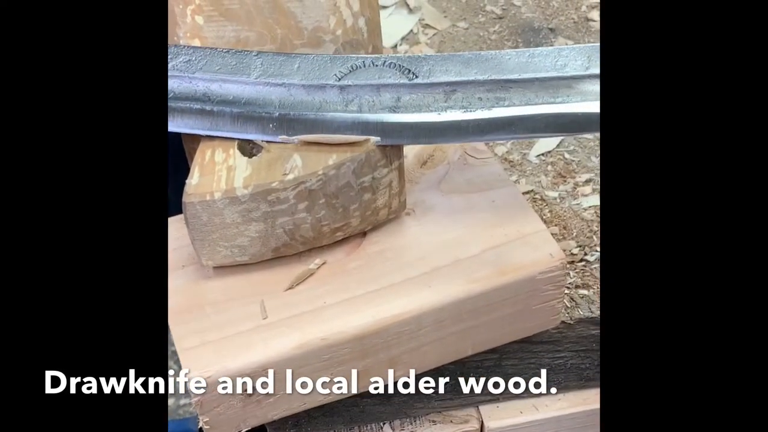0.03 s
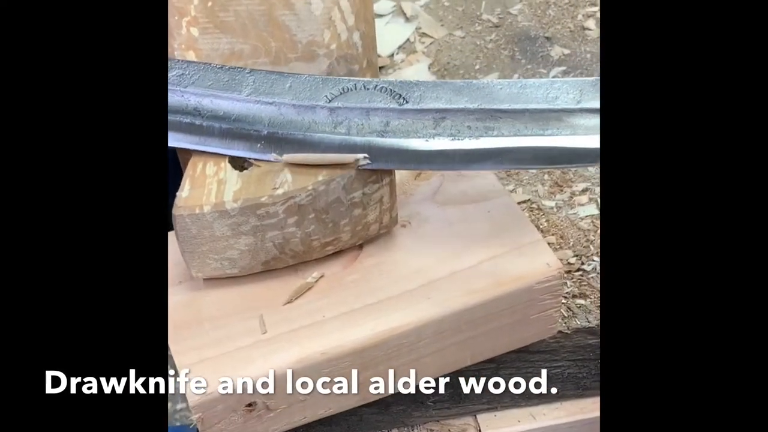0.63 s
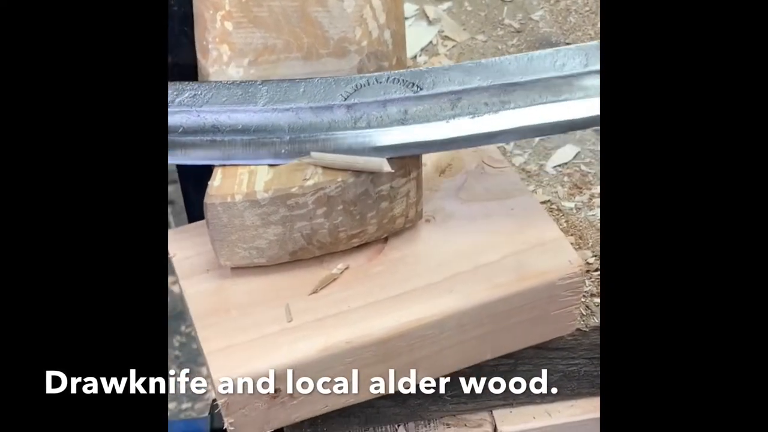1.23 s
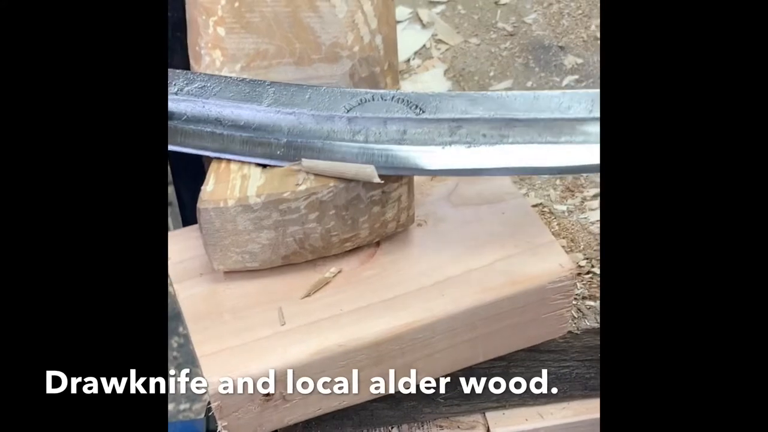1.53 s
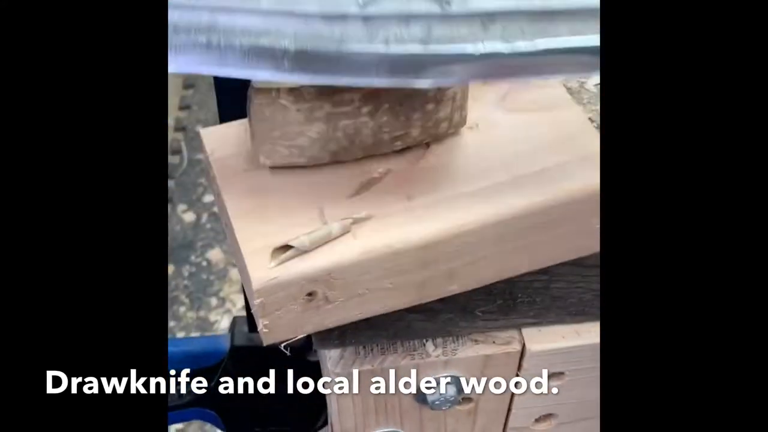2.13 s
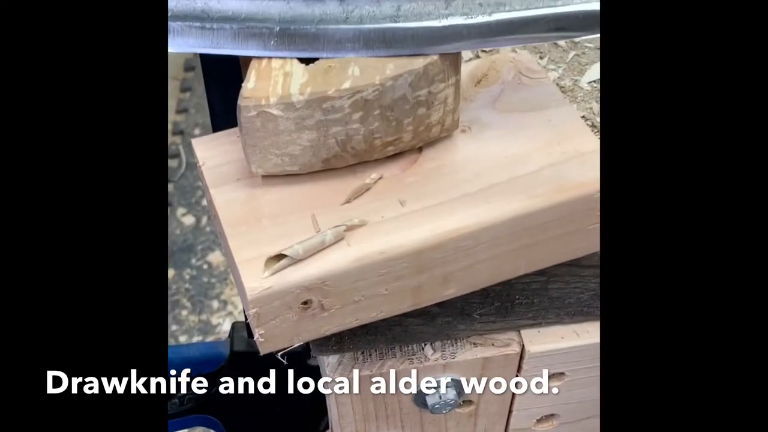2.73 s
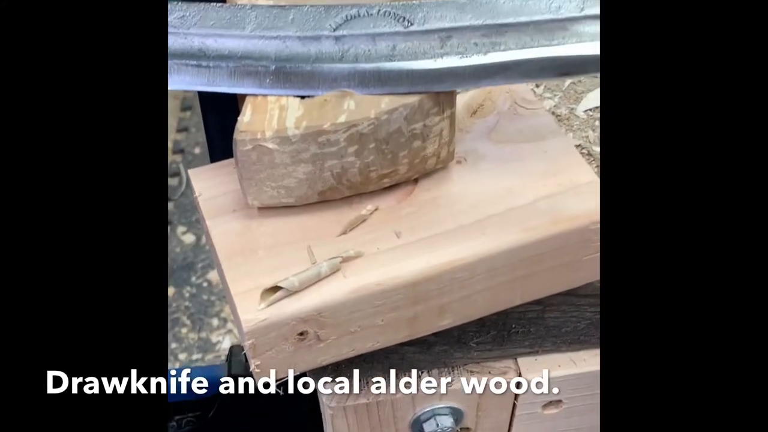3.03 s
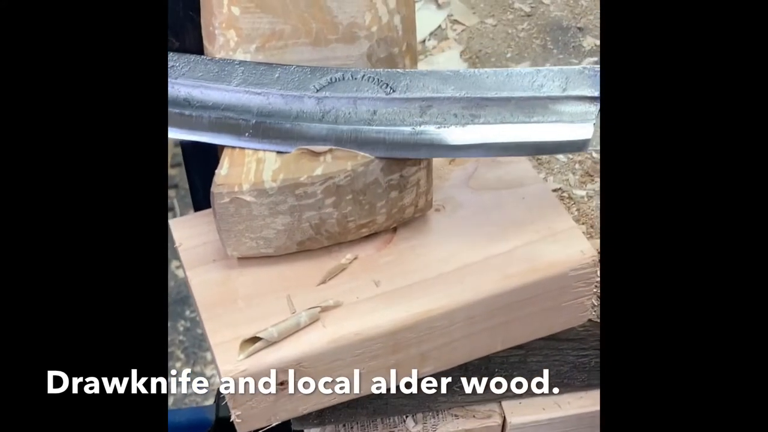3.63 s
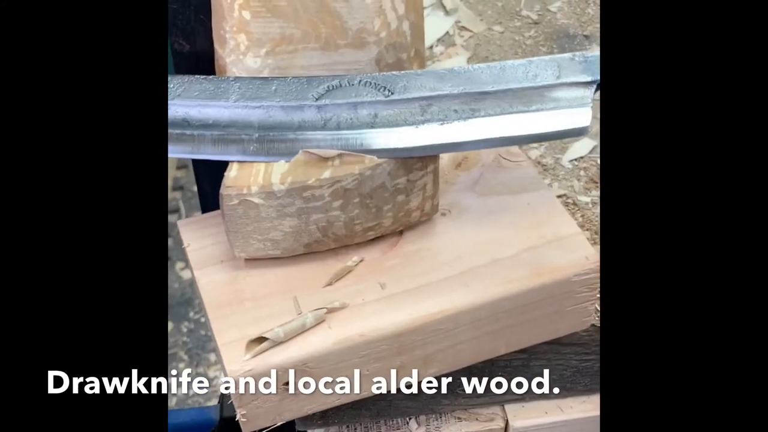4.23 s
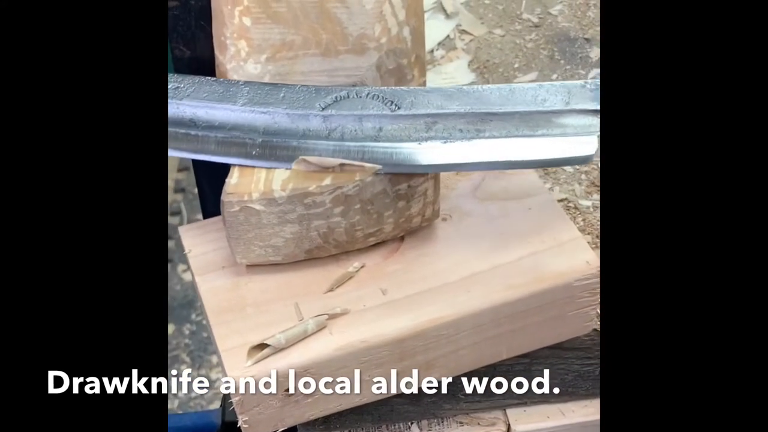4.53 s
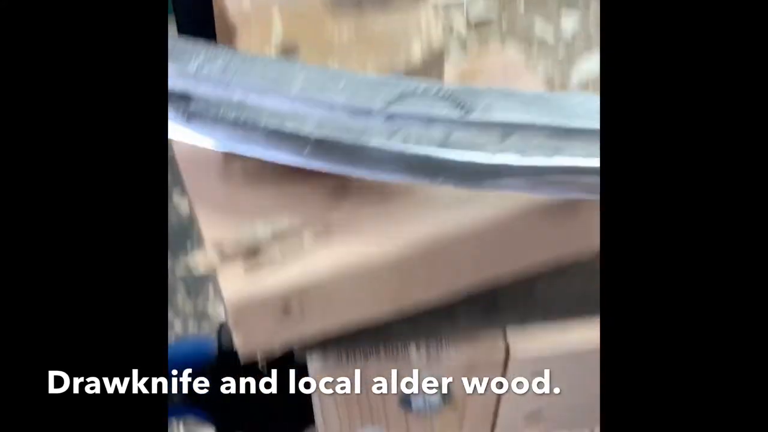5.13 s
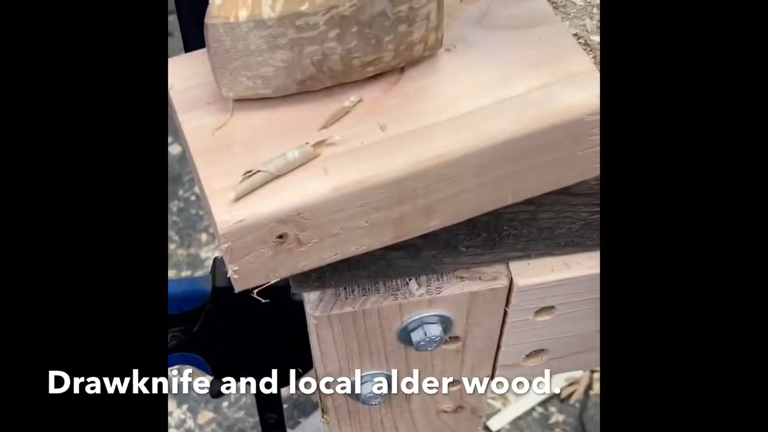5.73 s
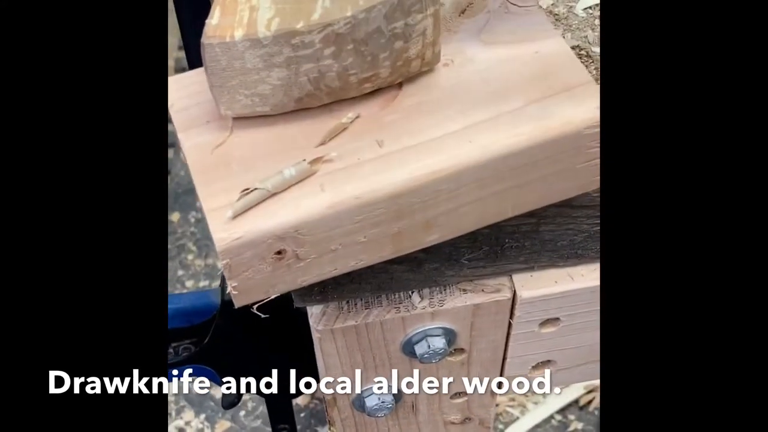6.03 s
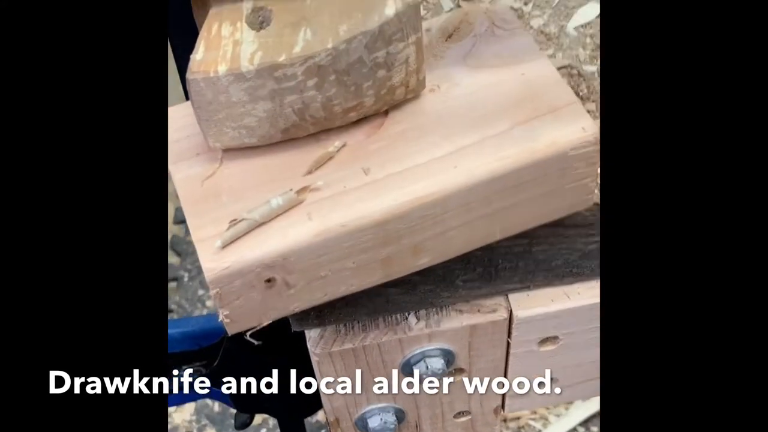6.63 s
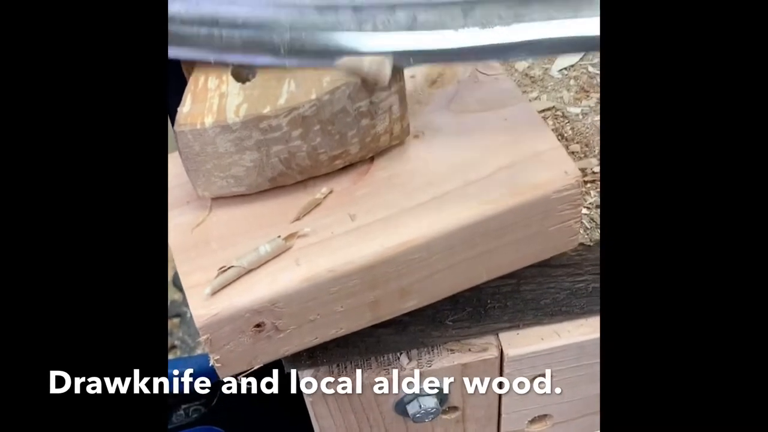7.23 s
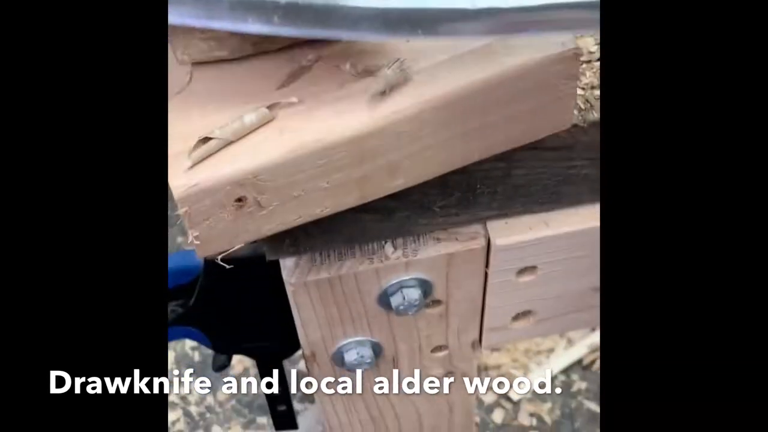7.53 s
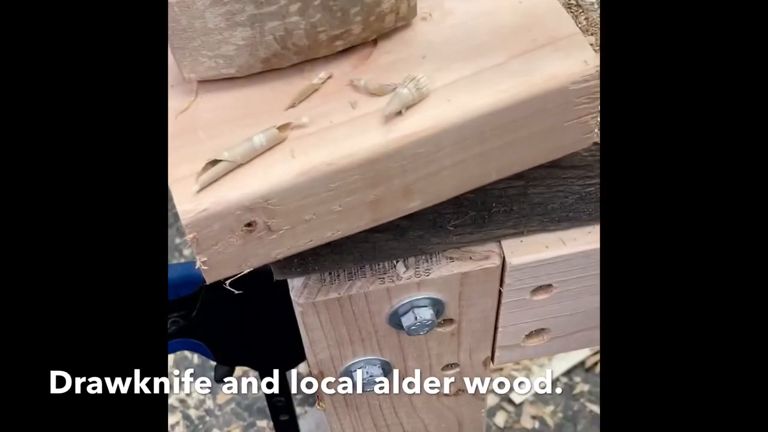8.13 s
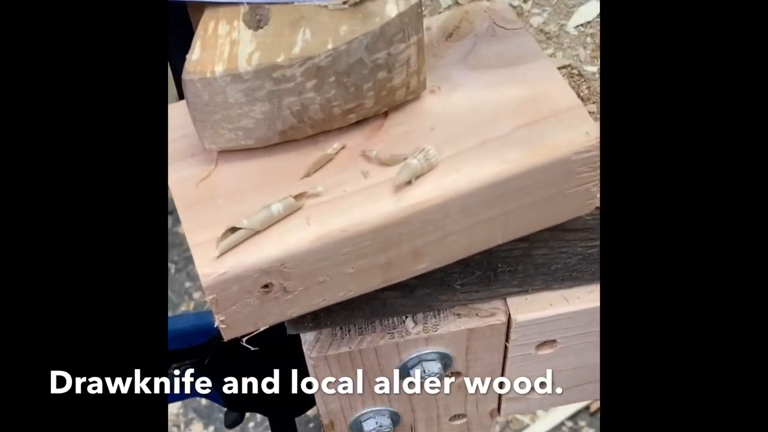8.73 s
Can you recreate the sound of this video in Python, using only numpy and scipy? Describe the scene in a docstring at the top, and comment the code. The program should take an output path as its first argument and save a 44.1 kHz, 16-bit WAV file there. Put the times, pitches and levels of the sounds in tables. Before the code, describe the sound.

Close, uneven strokes of a steel blade shaving wood, light scrapes alternating with crackling tears and a few wooden knocks.

```python
"""Drawknife on alder

A drawknife shaves a billet on a workshop bench, close to a phone with two microphone ports.
The edge glides over the grain, bites and rips off shavings: fibres snap and ring the blade,
slips shake the billet, the sticking edge creaks. The tool knocks on the wood and the bench bumps.
The small room answers over a low rumble, a faint hum and a distant rush."""
import sys
import numpy as np
from scipy import signal
from scipy.fft import rfft, irfft
from scipy.io import wavfile
from scipy.ndimage import uniform_filter1d

SR = 44100
rng = np.random.default_rng(int(sys.argv[2]) if len(sys.argv) > 2 else 0)


def unload_wav(signal):
    """Save mono or channel-first audio to the path in sys.argv[1] as 16-bit WAV at rate SR, clipped to [-1, 1]."""
    wavfile.write(
        sys.argv[1],
        SR,
        np.round(np.clip(np.atleast_2d(signal).T, -1, 1) * 32767).astype(np.int16),
    )


N = 396459
T = np.arange(N) / SR

# Room rumble spectrum (frequency [Hz], level [dB])
RUMBLE_COLOUR = [(20, -24), (40, -5), (70, 0), (110, -4), (160, -7), (230, -20), (400, -31), (800, -39),
                 (1500, -44), (4000, -44), (8000, -41), (15000, -43)]
# Distant rush envelope (time [s], level [dB])
RUSH_LEVEL = [(0, -72), (1.9, -89.5), (5.3, -69.5), (6.2, -67), (9, -68)]
# Side signal of the wood's low tones (time [s], gain [dB])
SIDE_GAIN = [(0, 2), (1.6, -5), (2.8, 7), (5, -13), (6.8, -36.5), (9, -30)]
# Lead of the left port (frequency [Hz], phase [rad])
PORT_PHASE = [(0, 0), (700, 0), (1150, 1.2), (1550, 1.6), (2200, .8), (2700, 1.), (4300, 1.2), (5500, 3.1),
              (6300, 3.2), (7900, 6.), (9000, 6.6), (10500, 9.2), (11600, 9.4), (13200, 12.4),
              (14300, 12.8), (15700, 15.5)]
# Clamped billet modes (frequency [Hz], level [dB], ring time [ratio])
BILLET_MODES = [(164, -16, 2.5), (207.2, -1, 1.2), (231.3, -7.5, .7), (284, -8, 0.63), (310, -4.5, 1.7),
                (381.9, -2, 1.1), (417.5, -3.5, 1.3), (477, -7, 1.4), (520.2, -5, 0.72),
                (575.6, -5.5, 0.97), (624, -4, 1.2), (679, -10, 0.75), (1064, -12.5, 1.3), (1144, -2, 0.86),
                (1147, -8, 1.0), (1300, -15, 0.35), (1510, -9.5, 0.9), (1640, -13, 1.5),
                (1710, -12.5, 0.47), (2200, -14.5, .54)]
# Blade-on-wood resonances (frequency [Hz], width [Hz], lift [dB])
CONTACT_MODES = [(1180, 150, 4), (1520, 170, 4), (2160, 40, 3), (2450, 150, 2), (3000, 200, 2),
                 (3300, 150, 3), (4590, 120, 3), (4950, 138, 4), (5210, 117, 6), (5740, 220, 7),
                 (5950, 200, 5), (6710, 299, 6), (6950, 277, 5), (7450, 94, 4), (7790, 340, 5),
                 (8550, 157, 8), (10060, 450, 6), (15400, 686, 6)]
# Narrow steel modes (frequency [Hz], width [Hz], lift [dB])
STEEL_MODES = [(1132, 45, 5), (2993, 60, 4), (3261, 25, 6), (3354, 25, 7), (4284, 18, 6), (4578, 20, 6),
               (7737, 27, 6), (7913, 27, 6)]
# Knock crack spectrum (frequency [Hz], level [dB])
KNOCK_COLOUR = [(500, -25.5), (1500, -0.5), (2700, -1.5), (4500, -5), (7000, -5.5), (10000, -13),
                (15500, -14)]
# Gliding edge spectrum (frequency [Hz], level [dB])
GLIDE_EDGE_COLOUR = [(200, -22), (500, -4), (900, -6.5), (1900, -9), (2700, 1.5), (4000, -0.5), (6000, 2),
                     (9000, -11), (12500, -13.5), (15500, -18.5)]
# Grazed billet spectrum (frequency [Hz], level [dB])
GLIDE_BILLET_COLOUR = [(60, -13.5), (140, -12.5), (210, 0), (400, 3.5), (600, -2.5), (800, -8.5),
                       (1100, -13.5), (1500, -12), (2100, -23), (4000, -41)]
# Cutting edge spectrum (frequency [Hz], level [dB])
CUT_EDGE_COLOUR = [(200, -30.5), (500, -1), (900, -5.5), (1900, -5.5), (2700, -16), (4000, 3), (6000, 3.5),
                   (9000, -5), (12500, -8.5), (15500, -11.5)]
# Jerked billet spectrum (frequency [Hz], level [dB])
CUT_BILLET_COLOUR = [(60, -15.5), (140, -26.5), (210, -3), (400, 2.5), (600, -2), (900, -15.5),
                     (1500, -18.5), (4000, -51)]
# Soft bench bumps (time [s], peak [dB], pitch [Hz], T60 [s])
BENCH_BUMPS = [(0.466, -49, 89, 0.58), (2.644, -30.5, 107, 0.069), (7.463, -25.5, 75, 0.1),
               (7.506, -23, 84.3, 0.055)]
# Blows on the billet, relative levels (time [s], thud [dB], billet [dB], ring [dB], crack [dB],
# T60 [s], billet pitch [Hz], ring pitch [Hz], crack top [Hz])
BLOWS = [(0.3007, -38, -30.5, -33, -22.5, 0.22, 557, 1560, 15900),
         (.467, -33, -22, -35, -32, 0.15, 445, 1300, 14000),
         (.492, -28, -30, -47.5, -54, 0.15, 350, 1500, 6100),
         (1.635, -39, -25, -43, -41, 0.17, 212, 960, 8840),
         (1.755, -44.5, -30, -35.5, -45, 0.16, 429, 1202, 3970),
         (1.769, -53, -28.5, -40.5, -45, 0.073, 384, 1620, 4140),
         (2.489, -50, -35.5, -55, -61, 0.17, 370, 1300, 3000),
         (2.5, -42, -51, -66, -53.5, 0.14, 405, 1420, 7100),
         (2.644, -30.5, -40.5, -41, -62, 0.059, 379, 770, 4000),
         (4.481, -73.5, -48.5, -45.5, -44, 0.13, 530, 1970, 5200),
         (4.547, -74, -60.5, -54, -65, 0.1, 495, 1770, 5100),
         (5.106, -55, -35, -40, -49.5, 0.12, 624, 1190, 6000),
         (7.212, -32, -21.5, -26.5, -30, 0.21, 337, 1430, 5910),
         (7.362, -45, -42, -41.5, -57.5, .12, 420.5, 1617, 2930),
         (7.668, -65.5, -55.5, -66.5, -83.5, 0.067, 446, 1194, 4040),
         (8.005, -39.5, -17, -22, -37.5, 0.25, 463, 1100, 4420)]
# Creaks of the sticking edge (start [s], length [s], first pitch [Hz], last pitch [Hz], level [dB])
EDGE_CREAKS = [(.312, 0.042, 1570, 1770, -45), (0.428, 0.015, 1350, 1300, -49.5),
               (0.481, 0.043, 1430, 1515, -43.5), (1.535, 0.088, 3320, 3230, -44),
               (1.568, .12, 1550, 1420, -46), (1.658, 0.057, 3100, 2740, -42),
               (2.71, 0.039, 2930, 2730, -57), (2.964, .06, 2850, 2924, -55),
               (4.728, 0.074, 1570, 1500, -54.5), (4.859, 0.2, 1566, 1420, -48.5),
               (4.897, 0.09, 2420, 2460, -45), (4.994, 0.044, 2120, 1970, -40.5),
               (4.999, 0.027, 3040, 2860, -35), (6.332, 0.076, 2704, 2770, -48.5),
               (7.179, .035, 3275, 2920, -27), (7.22, 0.059, 4620, 4560, -39.5)]
# Splinter snaps, relative levels (time [s], treble [dB], middle [dB])
SPLINTERS = [(.249, -46, -41.5), (0.611, -41, -40), (1.087, -42, -62), (1.372, -44, -41.5),
             (1.401, -42, -69.5), (1.518, -55, -35), (1.531, -30, -64), (1.544, -50, -33.5),
             (1.612, -28, -34), (1.637, -21.5, -28.5), (1.679, -32, -37.5), (1.707, -35, -48.5),
             (1.728, -33, -38), (1.731, -34, -43.5), (4.174, -63, -44), (4.205, -44.5, -52.5),
             (4.872, -65, -40.5), (4.903, -40, -41), (4.975, -30, -33.5), (5.061, -39, -43),
             (5.074, -41, -41), (5.187, -59, -57), (5.774, -52, -47.5), (5.976, -57.5, -58.5),
             (6.623, -65, -39.5), (6.839, -53, -39), (7.089, -43, -38), (7.14, -27, -22.5),
             (7.313, -50, -66), (8.247, -36, -48), (8.258, -48, -43), (8.27, -31.5, -38), (8.399, -42, -43),
             (8.442, -42, -27), (8.449, -32.5, -25), (8.555, -40, -56), (8.573, -48, -29.5),
             (8.702, -42, -43), (8.709, -34, -40.5), (8.764, -41, -43), (8.867, -43, -38),
             (8.876, -46, -52), (8.883, -42, -31.5), (8.947, -48, -49), (8.961, -30, -25.5)]
# Light passes, relative levels (start [s], rise [s], fall [s], edge [dB], billet [dB],
# rasp [Hz], squeak [Hz], top lift [dB])
GLIDE_STROKES = [(0, 0.0017, 0.043, -51, -54.5, 2680, 4210, -8),
                 (.072, 0.029, 0.052, -43.5, -50.5, 2840, 4500, 4.5),
                 (.15, 0.1, 0.19, -48.5, -57, 2910, 4400, 1.5),
                 (.385, 0.088, 0.061, -50, -45, 2500, 4500, -10),
                 (.585, 0.048, 0.18, -47.5, -47.5, 2760, 4270, 6.5),
                 (.865, 0.056, 0.14, -50.5, -59.5, 3300, 4150, 0.5),
                 (.925, 0.05, 0.091, -46, -52.5, 3010, 4170, 7),
                 (1.19, 0.21, 0.19, -52, -68, 2950, 5000, 3.5),
                 (1.435, 0.043, .029, -48, -56, 3170, 4900, 3),
                 (2.58, 0.034, 0.079, -61, -54.5, 2750, 4680, -12),
                 (2.58, 0.29, 0.4, -62, -58.5, 2850, 4700, 10),
                 (2.62, 0.049, 0.2, -52.5, -55.5, 2630, 4740, -5),
                 (2.71, 0.021, 0.028, -53.5, -54, 2860, 4770, -2),
                 (2.76, 0.037, 0.063, -55, -57.5, 2950, 4800, -3),
                 (2.81, 0.032, 0.023, -57, -60, 3000, 4700, -9),
                 (2.872, 0.024, 0.14, -52, -55, 2800, 4750, -7),
                 (2.955, 0.015, 0.043, -49, -59, 2760, 4920, -6),
                 (2.97, 0.03, 0.07, -49, -50, 2840, 4900, -7),
                 (3.075, 0.037, 0.067, -49, -53.5, 3020, 5200, -3),
                 (3.14, 0.018, 0.14, -57.5, -60, 2750, 4900, 3),
                 (3.205, 0.028, 0.2, -59.5, -83, 2880, 5030, 6),
                 (3.33, 0.036, 0.13, -53, -64.5, 3180, 5100, -1),
                 (3.415, 0.033, 0.1, -51, -62, 2700, 5100, 0), (3.47, 0.02, 0.24, -58, -76, 2990, 4960, 4),
                 (3.69, 0.031, 0.1, -66, -94, 2710, 4600, -8),
                 (3.795, 0.0086, 0.056, -58.5, -83, 2470, 4600, 0.5),
                 (3.88, .11, 0.12, -62.5, -90.5, 2850, 4440, -2.5),
                 (4.105, 0.074, 0.14, -48, -61, 3290, 4170, 1),
                 (4.22, 0.13, 0.41, -63.5, -82.5, 3300, 4520, 5),
                 (4.4, 0.025, 0.074, -50, -59, 2630, 4900, 0),
                 (4.62, 0.039, 0.03, -70, -62.5, 2990, 4800, 7),
                 (4.675, 0.071, 0.094, -46.5, -49.5, 3315, 5050, 3),
                 (6.3, 0.079, 0.052, -45.5, -66, 2710, 4320, -8.5),
                 (6.44, 0.08, 0.027, -60, -65.5, 3140, 4680, -3),
                 (6.535, 0.049, 0.025, -48, -61, 2800, 4600, -5),
                 (6.598, 0.036, 0.039, -45.5, -49.5, 3200, 4620, -6.5),
                 (6.738, 0.028, 0.074, -48.5, -55.5, 2710, 4470, -5),
                 (6.82, 0.022, 0.026, -40, -51, 3300, 4900, 3),
                 (6.825, 0.064, 0.076, -45, -47, 3100, 4770, 1)]
# Biting pulls, relative levels (start [s], rise [s], fall [s], edge [dB], billet [dB],
# top lift [dB], 4-6 kHz lift [dB], rasp [Hz], low rasp [Hz], billet pitch [Hz])
CUT_STROKES = [(.47, 0.034, 0.06, -50, -45.5, 3, 1, 3320, 1480, 395),
               (1.495, 0.047, 0.066, -46, -67, 3, 0, 3420, 1540, 300),
               (1.49, .17, 0.064, -38, -32.5, 18.5, 4, 2880, 1060, 277),
               (1.715, 0.018, 0.069, -49, -55.5, 10, -31, 2790, 1130, 298),
               (4.14, 0.056, .055, -49, -58, -2, -9, 3450, 1470, 550),
               (4.85, 0.062, 0.058, -45, -60, 4, 7, 2600, 1550, 340),
               (4.87, 0.15, 0.033, -36, -27, 18, -8, 2700, 1490, 434),
               (5.035, 0.084, 0.066, -50, -42, 14, 2, 2360, 1190, 553),
               (7.02, 0.062, 0.072, -46, -46, 5, 2, 2930, 1480, 466.5),
               (7.11, 0.084, 0.072, -25.5, -29, 5.5, 2, 3260, 1570, 393),
               (7.19, 0.051, 0.058, -35.5, -27, 11, 2, 2900, 1410, 390),
               (7.27, 0.036, 0.21, -62.5, -42.5, 10.5, 6, 2720, 1400, 400),
               (8.24, 0.024, 0.081, -42, -47.5, -4, 3.5, 2910, 1600, 394),
               (8.27, 0.16, 0.097, -44, -43, -20, 4, 3000, 1360, 314),
               (8.412, 0.044, 0.032, -37.5, -36.5, 14, -6, 3160, 1520, 356),
               (8.46, 0.13, 0.072, -44, -41, 0, 0.5, 3200, 1480, 386),
               (8.61, 0.098, 0.18, -51.5, -53.5, 1, 5.5, 3150, 1540, 400),
               (8.835, 0.075, 0.063, -38.5, -35.5, 8.5, 2, 3060, 1520, 320),
               (8.925, 0.054, 0.043, -35, -28.5, 13, -1, 3030, 1380, 405)]

BLADE_MODES = CONTACT_MODES + STEEL_MODES
SIDE_SIGN = np.array([[1], [-1]])


def undb(db):
    """Decibels to gain."""
    return 10 ** (np.asarray(db) / 20)


def unit(x):
    """Scale to rms 1."""
    return x / np.sqrt(np.mean(x ** 2) + 1e-20)


def fade(t, t60_s):
    """Decay by 60 dB in t60_s."""
    return np.exp(-np.log(1000) * t / max(t60_s, 1e-4))


def add(track, at_s, sound):
    """Mix a sound in at a time."""
    i = max(int(at_s * SR), 0)
    track[i:i + len(sound)] += sound[:N - i]


def butter(x, hz, kind, order=2, run=signal.sosfilt):
    """Butterworth filter, causal by default."""
    return run(signal.butter(order, hz, kind, fs=SR, output="sos"), x)


def band(x, lo_hz, hi_hz, order=2):
    """Causal band-pass."""
    return butter(x, [lo_hz, min(hi_hz, .47 * SR)], "band", order)


def through(x, impulse):
    """Convolve, keeping the length."""
    return signal.oaconvolve(x, impulse)[:len(x)]


def response(colour, peaks=(), size=4096):
    """Minimum-phase impulse response of energy 1 from a spectrum plus resonances."""
    hz = np.maximum(np.fft.rfftfreq(size, 1 / SR), 1)
    knot_hz, knot_db = np.transpose(colour)
    db = np.interp(np.log(hz), np.log(knot_hz), knot_db)
    db += sum(lift / (1 + (2 * (hz - f) / width) ** 2) for f, width, lift in peaks)
    cepstrum = irfft(np.log(undb(db)))[:size // 2]
    cepstrum[1:] *= 2
    impulse = irfft(np.exp(rfft(cepstrum, size)))
    return impulse / np.linalg.norm(impulse)


def walk(rate_hz):
    """Slewed random steps, rms 1."""
    hold = max(int(SR / rate_hz), 1)
    steps = np.repeat(rng.standard_normal(N // hold + 1), hold)[:N]
    return unit(uniform_filter1d(steps, hold))


def fractures(rate_hz, spread_db):
    """Random clicks of uneven size, rms 1."""
    fires = rng.random(N) < rate_hz / SR
    size = np.minimum(rng.exponential(size=N), 5)
    return unit(fires * undb(spread_db * size) * rng.choice([-1, 1], N))


def rasp(x, hz, width_hz):
    """Resonance of moving pitch; keeps the power of white input."""
    carrier = np.exp(2j * np.pi * np.cumsum(hz) / SR)
    ring = butter(x / carrier, width_hz / 2, "low")
    return (ring * carrier).real * np.sqrt(2 * SR / width_hz)


def along_blade(x, depth, trip_ms, drift, count=3):
    """Waves return from the ends of blade and shaving; delays waver as the contact wanders."""
    index, echoes = np.arange(N), np.zeros(N)
    for k in range(count):
        wander = np.interp(T, np.arange(0, 10, .2), rng.standard_normal(50))
        delay = trip_ms * 1e-3 * SR * (k + 1) ** .5 * np.exp(drift * wander)
        echoes += (-1) ** k * np.interp(index - delay, index, x)
    return (x + depth * echoes) / np.sqrt(1 + count * depth ** 2)


def damped_billet(colour, width_hz=28, lift_db=7):
    """Billet response under the pressing blade: modes become humps."""
    return response(colour, [(hz, width_hz, lift_db * undb(db)) for hz, db, _ in BILLET_MODES])


def background(rumble_db=-59, hum_db=-66, hum_hz=150):
    """Low restless rumble, wavering hum and a trace of wider hiss."""
    mid, side = (through(rng.standard_normal(N), response(RUMBLE_COLOUR)) for _ in range(2))
    side = undb(-18) * side + band(side, 700, 18000)
    hum = undb(hum_db) * (1 + .5 * walk(14)) * np.sqrt(2) * np.sin(2 * np.pi * hum_hz * T)
    return undb(rumble_db + .5 * walk(.45)) * (mid + side * SIDE_SIGN) + hum


def distant_rush():
    """Faint dull noise from further off."""
    dull = response([(120, -25), (300, -3), (600, -13), (1150, -19.5), (1600, -25.5), (5000, -40.5)])
    mid, side = (unit(through(rng.standard_normal(N), dull)) for _ in range(2))
    level_db = np.interp(T, *np.transpose(RUSH_LEVEL)) + 2 * walk(210)
    return undb(level_db) * (mid + .5 * side * SIDE_SIGN)


def workshop(x, early_db=-8, late_db=-18, early_s=.046, late_s=.41, treble_db=-7, dull_hz=1500):
    """Bench and walls return quick echoes and a weak dull tail; the bass stays centred."""
    t = np.arange(SR) / SR
    noise = rng.standard_normal((2, 2, SR)) * (t > .004)
    early, late = (unit(n * fade(t, t60_s)) / np.sqrt(SR) for n, t60_s in zip(noise, (early_s, late_s)))
    dull = butter(undb(early_db) * early + undb(late_db) * late, dull_hz, "low")
    mid, side = dull + undb(early_db + treble_db) * butter(early, dull_hz, "high", order=1)
    side = butter(side, 950, "high", order=1)
    return np.array([through(x, mid + side), through(x, mid - side)])


def spread(x, middle_db=3, scatter_s=.06):
    """The wood's low tones sound wide at first, centred for the last strokes."""
    t = np.arange(SR // 10) / SR
    scatter = unit(rng.standard_normal(len(t)) * fade(t, scatter_s) * (t > .003)) / np.sqrt(len(t))
    side = through(band(x, 110, 700) + undb(middle_db) * band(x, 850, 1400), scatter)
    return undb(np.interp(T, *np.transpose(SIDE_GAIN))) * side * SIDE_SIGN


def ports(x, lean_db=1.5, lean_hz=1700):
    """Two microphone ports hear the blade by separate paths, out of phase; the mids lean right."""
    hz = np.maximum(np.fft.rfftfreq(N, 1 / SR), 1)
    lean = undb(-lean_db / 2 * np.exp(-np.log2(hz / lean_hz) ** 2))
    left = lean * np.exp(.5j * np.interp(hz, *np.transpose(PORT_PHASE)))
    paths = np.array([along_blade(x, depth=.12, trip_ms=.6, drift=.29) for _ in range(2)])
    return irfft(rfft(paths) * np.array([left, 1 / left]), N)


def bumps(rise_s=.0058):
    """Soft pushes rock the bench in one low mode."""
    out, t = np.zeros(N), np.arange(SR // 2) / SR
    for at_s, db, hz, t60_s in BENCH_BUMPS:
        swing = -np.sin(2 * np.pi * hz * t) * fade(t, t60_s) * (1 - np.exp(-t / rise_s))
        add(out, at_s, undb(db) * swing / np.abs(swing).max())
    return out


def knocks(crack_s=.028, buzz_db=-25, buzz_s=.35, lag_s=.0015, detune=.014):
    """Each blow cracks at the contact, rings the billet and leaves the blade chattering."""
    out, t = np.zeros(N), np.arange(SR // 2) / SR
    onset = slice(0, SR // 80)
    contact = response(KNOCK_COLOUR, [(hz, width, lift / 2) for hz, width, lift in BLADE_MODES])
    crack_decay = fade(t, crack_s) + undb(buzz_db) * fade(t, buzz_s)
    # the wood yields within 1 ms; the clamp soon soaks up half the swing
    press = (1 - np.exp(-t / .0007)) * (1 + 1.2 * fade(t, .07))
    for at_s, thud_db, billet_db, ring_db, crack_db, t60_s, billet_hz, ring_hz, top_hz in BLOWS:
        noise = rng.standard_normal((2, len(t)))
        grip = rng.standard_normal((len(BILLET_MODES), 2))  # grip shifts each mode's level and pitch
        modes = sum(undb(db + shift_db) * np.sin(2 * np.pi * hz * (1 + detune * shift) * t)
                    * fade(t, t60_s * life)
                    for (hz, db, life), (shift_db, shift) in zip(BILLET_MODES, grip))
        wood = press * (modes + 3.5 * noise[0] * fade(t, t60_s))
        crack = band(through(noise[1] * crack_decay, contact), 900, top_hz)
        parts = [(band(wood, 61, 240), thud_db - 3),
                 (band(wood, billet_hz / 1.264, billet_hz * 1.423, order=3), billet_db - 2),
                 (band(wood, ring_hz / 1.44, ring_hz * 1.17), ring_db - 2)]
        add(out, at_s, undb(crack_db + 1) * crack / np.std(crack[onset]))
        add(out, at_s + lag_s, sum(undb(db) * part / np.std(part[onset]) for part, db in parts))
    return out


def creaks(width_hz=70):
    """The sticking edge holds one wood resonance, which slides in pitch and lets go."""
    out = np.zeros(N)
    for at_s, length_s, first_hz, last_hz, db in EDGE_CREAKS:
        progress = np.linspace(0, 1, int(length_s * SR), endpoint=False)
        friction = rng.standard_normal(SR // 2)[:len(progress)]
        tone = unit(rasp(friction, first_hz + (last_hz - first_hz) * progress, width_hz))
        add(out, at_s, undb(db) * tone * np.sqrt(np.sin(np.pi * progress)))
    return out


def crackle(effort):
    """Lone dry fibres part with bright ticks, louder with effort up to a cap."""
    ticks = fractures(45, spread_db=3) * np.minimum(effort, undb(-40))
    return undb(-19) * band(ticks, 5000, 16000)


def splinters(snap_s=.0028, ring_s=.007):
    """A splinter snaps, pings at its own pitch and briefly rings the blade."""
    out, t = np.zeros(N), np.arange(2048) / SR
    blade = response(GLIDE_EDGE_COLOUR, CONTACT_MODES)
    for at_s, treble_db, middle_db in SPLINTERS:
        noise = rng.standard_normal((2, len(t))) * (1 - np.exp(-t / .0002))
        tick = band(noise[0] * fade(t, snap_s), 8200, 21000, order=4)
        burst = noise[1] * fade(t, ring_s)
        ping = rasp(burst, np.full(len(t), rng.uniform(7300, 10000)), width_hz=1800)
        parts = [(tick, treble_db + 19), (ping, treble_db + 16), (through(burst, blade), middle_db + 22)]
        add(out, at_s, sum(undb(db) * part / np.linalg.norm(part) for part, db in parts))
    return out


def strokes(table, depth_db, roundness, lag_s, billet_power):
    """Swelling gains of edge and lagging billet, then the other columns averaged by edge gain."""
    edge, billet, weight = np.zeros((3, N))
    traits = np.zeros((len(table[0]) - 5, N))
    for start_s, rise_s, fall_s, edge_db, billet_db, *own in table:
        near = slice(max(int((start_s - rise_s) * SR), 0), int((start_s + rise_s + 3 * fall_s) * SR))
        from_peak_s = T[near] - start_s - rise_s
        swell, load = (undb(-depth_db * np.maximum(-t / rise_s, t / fall_s) ** roundness)
                       for t in (from_peak_s, from_peak_s - lag_s))
        gain = undb(edge_db) * swell
        edge[near] += gain ** 2
        billet[near] += (undb(billet_db) * load ** billet_power) ** 2
        weight[near] += gain
        traits[:, near] += np.outer(own, gain)
    return np.sqrt(edge), np.sqrt(billet), *(traits / np.maximum(weight, 1e-30))


def gliding(edge, billet, rasp_hz, squeak_hz, top_db):
    """The edge slides and catches on the grain: friction clicks ring the blade, murmur in the billet."""
    grain = undb(1.5 * walk(110) - 1.94 * walk(43))
    clicks = fractures(3700, spread_db=1.5) * grain * edge
    blade = through(clicks, response(GLIDE_EDGE_COLOUR, BLADE_MODES))
    hiss = undb(1) * along_blade(blade, depth=.48, trip_ms=1.2, drift=.2)
    top = butter(hiss, 7400, "high", order=4, run=signal.sosfiltfilt)
    grazes = fractures(1500, spread_db=-4.5) * grain * billet
    murmur = undb(1.5) * through(grazes, damped_billet(GLIDE_BILLET_COLOUR))
    pressed = clicks * (edge / undb(-50)) ** .46  # pressure brings out the rasp
    wander = 1 + .03 * walk(18)  # pitches follow the contact point
    shaving = (undb(-5) * rasp(pressed, rasp_hz * wander, width_hz=480)
               + undb(-14) * rasp(clicks, .52 * rasp_hz * wander, width_hz=220)
               + undb(-10) * rasp(clicks, squeak_hz * wander, width_hz=540)
               + undb(-14) * rasp(clicks, 2.4 * rasp_hz * wander, width_hz=400))
    return hiss + top * (undb(top_db) - 1) + shaving + murmur


def bundles(edge, rasp_hz):
    """Fibre bundles give way in coarse bursts that ring the shaving, amid bright cracks."""
    t = np.arange(SR // 50) / SR
    tears = np.abs(fractures(170, spread_db=2))
    bursts = unit(through(tears, fade(t, .009)) * rng.standard_normal(N)) * edge
    cracks = .25 * band(fractures(160, spread_db=2) * edge, 4500, 17000)
    ring = rasp(bursts, rasp_hz * (1 + .03 * walk(68)), width_hz=4200)
    return cracks + undb(-4) * (2 * band(bursts, 800, 2100) + .5 * ring)


def cutting(edge, billet, top_db, presence_db, rasp_hz, low_hz, billet_hz):
    """The edge sticks and slips under a shaving; slips snap fibres and jerk the billet."""
    slips = unit(undb(2.5 * np.clip(walk(380), -2, 1.5)))
    clicks = fractures(5000, spread_db=3) * slips * edge
    blade = through(clicks, response(CUT_EDGE_COLOUR, BLADE_MODES))
    fibres = along_blade(blade, depth=.64, trip_ms=1.1, drift=.11)
    # a deep bite splits dry, brighter fibres; a thick shaving damps the blade's presence band
    top = butter(fibres, 9500, "high", run=signal.sosfiltfilt)
    presence = butter(fibres, [3800, 6200], "band", run=signal.sosfiltfilt)
    tearing = undb(2) * (fibres - top + presence * (undb(presence_db) - 1)) + top * undb(top_db)
    shaving = (undb(-2) * rasp(clicks, rasp_hz, width_hz=990)
               + undb(-11) * rasp(clicks, low_hz + 40 * walk(11), width_hz=220)
               + undb(-18) * rasp(clicks, 2380 + 70 * walk(20), width_hz=75))
    pushes = fractures(4000, spread_db=.6) * slips ** .23 * billet  # its mass evens out the slips
    jerks = undb(-1.5) * through(pushes, damped_billet(CUT_BILLET_COLOUR))
    hump = undb(-7) * rasp(pushes, billet_hz * (1 + .12 * walk(45)), width_hz=240)
    bench_shudder = undb(-39) * unit(band(rng.standard_normal(N), 67, 164)) * billet ** .27
    return tearing + shaving + bundles(edge, rasp_hz) + jerks + hump + bench_shudder


def scene():
    """Bench work, direct and through the room, over the background."""
    glide = strokes(GLIDE_STROKES, depth_db=25.6, roundness=.96, lag_s=.0048, billet_power=.8)
    cut = strokes(CUT_STROKES, depth_db=26, roundness=1.61, lag_s=.0055, billet_power=1.06)
    effort = glide[0] + cut[0]
    work = gliding(*glide) + cutting(*cut) + crackle(effort) + creaks() + knocks() + splinters() + bumps()
    return ports(work) + spread(work) + workshop(work) + background() + distant_rush()


def record(dry, top_hz=15850):
    """The phone cuts the top treble."""
    return signal.sosfilt(signal.ellip(10, .2, 80, top_hz, fs=SR, output="sos"), dry)


dry = scene()
out = record(dry)
unload_wav(out)
```